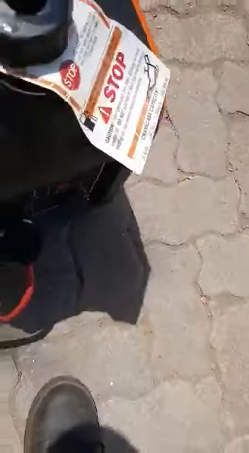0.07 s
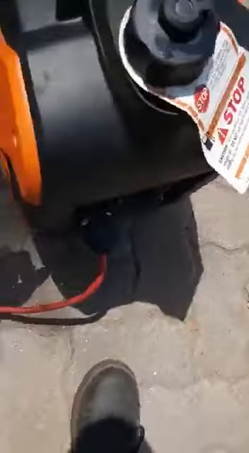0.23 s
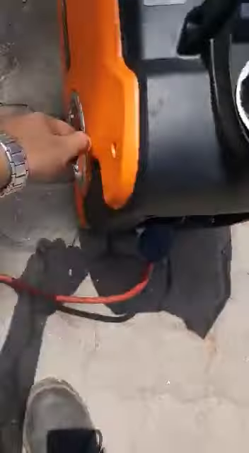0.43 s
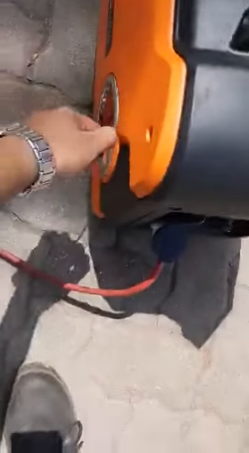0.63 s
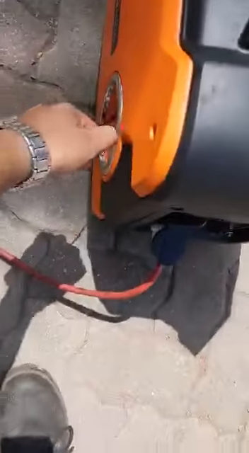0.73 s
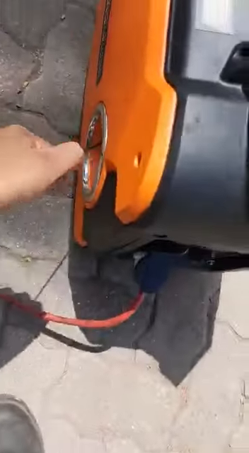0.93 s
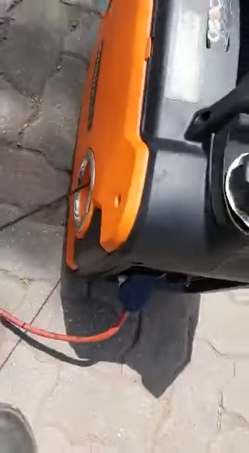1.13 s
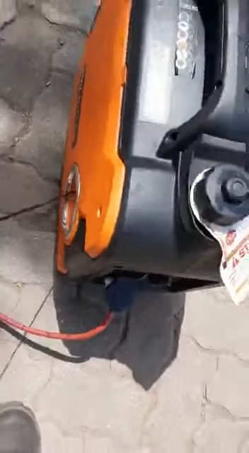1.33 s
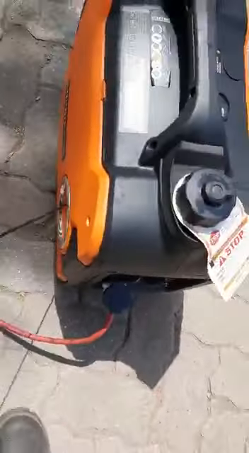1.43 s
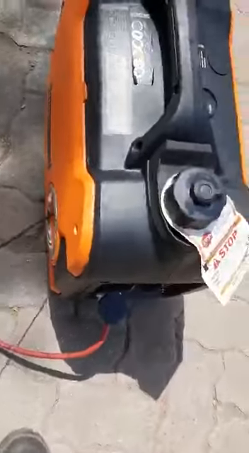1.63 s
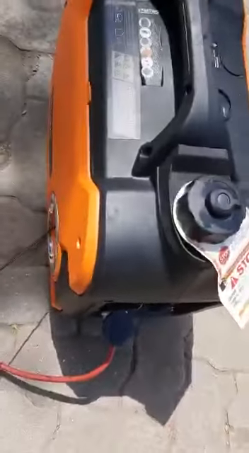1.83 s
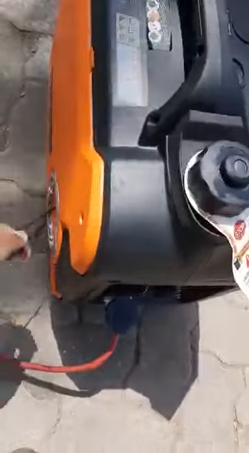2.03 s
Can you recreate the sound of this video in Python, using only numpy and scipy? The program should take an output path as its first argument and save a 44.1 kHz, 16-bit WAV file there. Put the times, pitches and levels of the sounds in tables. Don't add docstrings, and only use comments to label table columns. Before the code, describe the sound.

A small petrol generator is pull-started: light handling clicks, cord whir, metallic clack, then rapid thumping engine.

```python
import sys
import numpy as np
from scipy import signal
from scipy.fft import rfft, irfft
from scipy.io import wavfile

SR = 44100
rng = np.random.default_rng(int(sys.argv[2]) if len(sys.argv) > 2 else 0)


def voltage_ratio(level):
    return 10 ** (np.asarray(level, float) / 20)


def master(y):
    cut = np.clip(np.atleast_2d(y).T, -1, 1)
    pcm = np.round(cut * 32767)
    wavfile.write(sys.argv[1], SR, pcm.astype(np.int16))


N = 92345
T = np.arange(N) / SR

# (frequency [Hz], level [dB])
YARD_SPECTRUM = [(15, -37), (55, -4), (110, -10.5), (378, -17.5), (782, -35.5), (1500, -43.5),
                 (3000, -42.5), (15500, -48)]
# (frequency [Hz], likeness [0-1])
STEREO_LIKENESS = [(60, 0.2), (240, 0.59), (950, 0.16), (3770, 0.15), (15000, 0)]
# (time [s], left minus right [dB])
MIC_SWING = [(0.0, -0.5), (0.4, -2), (.7, -1), (1.2, 0.4), (2.09, 0.44)]
# (start [s], length [s], level [dB], colour [Hz], tilt above it [dB/octave])
RUBS = [(0.3514, 0.12, -38.5, 1670, -5.5), (.38, 0.038, -33, 2170, -8), (0.38, 0.046, -43.5, 590, -8.5),
        (0.55, 0.04, -43, 6500, -5), (0.626, 0.023, -37, 5070, -5), (0.714, 0.048, -38.5, 4200, -4.5),
        (.712, 0.045, -29, 410, -9.5), (1.5, 0.055, -27.5, 730, -5), (1.008, 0.47, -39, 2120, -10),
        (1.05, 0.42, -38.5, 540, -7)]
# (time [s], peak [dB], frequency [Hz], t60 [s])
BUMPS = [(0.104, -28.5, 143, 0.055), (0.404, -27, 106, 0.066), (0.439, -23, 310, 0.045),
         (0.468, -19, 144, 0.019), (0.514, -23, 72, 0.11), (0.75, -29, 70.0, 0.04),
         (0.927, -31, 195, 0.059), (0.972, -19, 158, 0.036), (0.999, -27.5, 101, 0.13),
         (1.195, -19, 235, 0.046), (1.05, -29, 267, 0.077), (1.273, -20, 139, 0.13),
         (1.285, -21.5, 336, .04), (1.379, -5.5, 201.4, 0.074), (1.387, -6.5, 300, 0.05)]
# (time [s], peak [dB], colour [Hz], decay [s])
TICKS = [(0.118, -27, 9300, 0.005), (0.2845, -36, 7200, 0.0071), (0.3616, -34, 2500, 0.0045),
         (0.362, -35, 7630, 0.0046), (0.389, -24, 1900, .008), (0.424, -28, 4000, 0.004),
         (0.4287, -22.5, 6370, 0.0047), (0.5406, -37, 5340, 0.0046), (0.579, -32.5, 8500, 0.004),
         (0.9995, -32, 1500, 0.006), (0.889, -34, 7800, 0.0057), (1.244, -19, 7310, 0.005),
         (1.2749, -23, 5490, 0.0065), (1.3, -16, 12000, 0.0079), (1.3323, -21.5, 14400, 0.0062),
         (1.3796, -9.5, 9000, 0.0066), (1.4115, -16, 5100, 0.0043), (1.535, -31, 11300, 0.0041),
         (1.5428, -19.5, 11100, 0.0088), (1.5515, -21, 14100, 0.0055), (1.6926, -32, 6180, 0.012),
         (1.8323, -30, 5980, 0.0065)]
# (time [s], level [dB])
SWITCH_HITS = [
    (.573, -21.5),
]
# (frequency [Hz], level [dB], t60 [s])
SWITCH_MODES = [(506, -5, 0.0073), (1020, 5, 0.0064), (1560, 2, 0.0052), (2200, -5, 0.0037)]
# (time [s], frequency [Hz], level [dB])
REEL_PULL = [(1.03, 689.2, -44.5), (1.07, 1025, -32.5), (1.104, 1360, -49.5), (1.14, 1650, -36.5),
             (1.18, 1900, -63), (1.2, 2110, -24), (1.218, 2178, -20), (1.228, 1923, -46),
             (1.243, 1630, -41)]
REEL_OVERRUN = [(1.245, 1900, -31), (1.255, 2335, -30.5), (1.264, 3077, -24), (1.288, 2927, -31.5),
                (1.299, 2938, -51), (1.344, 2753, -39), (1.366, 2420, -41), (1.384, 2150, -24)]
CORD_GUIDE_A = [(1, 1022, -42.5), (1.028, 1055, -53), (1.081, 1092, -32.5), (1.11, 1134, -42)]
CORD_GUIDE_B = [(1.163, 943, -39.5), (1.21, 1068, -32.5), (1.228, 1046, -40), (1.235, 960, -46)]
REEL_OVERTONE = [(1.145, 3700, -36), (1.179, 3850, -47.5), (1.211, 4200, -49), (1.25, 4300, -53)]
RETURN_SPRING = [(1.42, 749.5, -42), (1.476, 754, -38), (1.49, 700, -48)]
REEL_REWIND = [(1.586, 2200, -45), (1.63, 2330, -51), (1.682, 2200, -40), (1.726, 2068, -38),
               (1.751, 1920, -51), (1.772, 1810, -39.5), (1.809, 1590, -48)]
# (time [s], level [dB])
PAWL_HITS = [
    (1.380, -52),
    (1.411, -25),
    (1.422, -33),
]
# (frequency [Hz], level [dB], t60 [s])
PAWL_MODES = [(5240, -7, 0.17), (5350, -9.5, 0.11), (7090, -20, 0.05), (8300, -19, 0.045),
              (11500, -10, 0.048), (12340, -5, 0.11), (12580, -7, 0.092), (13300, -16, 0.1),
              (13700, -11, 0.08), (14800, -16, 0.099), (15210, -14, 0.09), (15720, -12, 0.09),
              (2350, -5, 0.024)]
# (time [s], level [dB], low edge [Hz], t60 [s])
SHIVERS = [
    (1.378, -20, 9000, 0.082),
    (1.409, -29.5, 10800, 0.28),
    (1.412, -16.5, 2980, 0.038),
]
# (time [s], peak [dB])
CASING_HITS = [(.391, -35), (.428, -32), (1.381, -14.5), (1.502, -14), (1.562, -18.5), (1.831, -18),
               (1.889, -36), (1.898, -22), (1.961, -22), (2.02, -21), (2.032, -25.5), (2.078, -27)]
# (frequency [Hz], level [dB], t60 [s])
CASING_MODES = [(1230, 4.5, 0.018), (1354, 1.5, 0.015), (1730, -2.5, 0.0063), (2200, -5, 0.013),
                (2830, -16, 0.0091), (830, -21, 0.009), (3900, -30, 0.008)]
# (frequency [Hz], level [dB])
CLATTER_SPECTRUM = [(290, -9), (450, 1), (680, -12), (1100, -12), (1770, -19.5), (2200, -16.5), (6180, -28),
                    (8600, -40.5), (15500, -35)]
# (time [s], strength [dB])
CYCLES = [(1.134, -26.5), (1.275, -10), (1.405, -9), (1.516, -8), (1.609, -7.5), (1.691, -7), (1.768, -7),
          (1.842, -7.5), (1.908, -5.5), (1.972, -5.5), (2.031, -4.5), (2.086, -11.5), (2.139, -13)]
# (place [0-1], sign, level [dB], push [ms], ring [Hz], t60 [s], boom [Hz], boom [dB])
STROKES = [
    (0, -1.05, 5.5, 2.41, 201, 0.012, 91.4, -44),
    (0.286, 0.96, 1.5, 2.24, 210, 0.011, 125, -14),
    (0.564, 1, -1.5, 2.4, 235, .035, 109, -34),
    (.83, 0.99, -14, 2.7, 222, 0.028, 70, -25),
]


def rms_one(x):
    return x / np.sqrt(np.mean(x ** 2) + 1e-20)


def at_hz(points, hz):
    point_hz, value = np.array(points).T
    return np.interp(np.log(hz), np.log(point_hz + 1), value)


def drift(rate_hz):
    r = np.exp(-2 * np.pi * rate_hz / SR)
    noise = rng.standard_normal(N + SR)
    return rms_one(signal.lfilter([1], [1, -2 * r, r * r], noise)[SR:])


def ring(drive, hz, t60_s):
    r = voltage_ratio(-60 / (t60_s * SR))
    w = 2 * np.pi * hz / SR
    return signal.lfilter([0, np.sin(w)], [1, -2 * r * np.cos(w), r * r], drive + 1e-18)


def clicks(s, size):
    out = np.zeros(N + SR)
    np.add.at(out, (np.asarray(s) * SR).astype(int), size)
    return out[:N]


def late(x, ms):
    return np.interp(T - ms / 1000, T, x, left=0)


def filtered(x, order, hz, kind):
    return signal.sosfilt(signal.butter(order, hz, kind, fs=SR, output="sos"), x)


def banded(spectrum, patchy_db):
    white = rng.standard_normal((2, 2, N))
    shared = drift(10.2)
    edges_hz = 22 * 2 ** np.arange(0, 9.6, .5)
    out = 0
    for k, (low, high) in enumerate(zip(edges_hz, edges_hz[1:])):
        mid, side = filtered(white[k % 2], 2, [low, high], "band")
        hz = np.sqrt(low * high)
        alike = np.clip(at_hz(STEREO_LIKENESS, hz), 0, 1)
        gain = voltage_ratio(at_hz(spectrum, hz) + patchy_db * (0.63 * shared + drift(13.9)))
        out = out + gain * (np.sqrt(1 + alike) * mid + np.sqrt(1 - alike) * side * [[1], [-1]])
    return rms_one(out)


def struck(hits, modes, spread_db, bounce_db):
    s, db = np.transpose(hits)
    s = np.r_[s, s + .0024]
    db = np.r_[db, db + bounce_db]
    out = 0
    for hz, level_db, t60_s in modes:
        strength_db = db + level_db + spread_db * rng.standard_normal(len(s))
        out = out + ring(clicks(s, voltage_ratio(strength_db)), hz, t60_s)
    return out


def yard():
    return voltage_ratio(-42.5) * banded(YARD_SPECTRUM, patchy_db=1.5)


def rubs():
    out = 0
    for s, length_s, db, hz, tilt_db in RUBS:
        grains = rng.standard_normal(N) * voltage_ratio(2.0 * drift(200))
        octave = np.log2(np.fft.rfftfreq(N, 1 / SR) / hz + 1e-6)
        colour = voltage_ratio(np.where(octave > 0, tilt_db * octave, 1.65 * octave))
        shape = np.interp(T, s + length_s * np.array([0, .12, .6, 1]), [0, 0.72, 1.0, 0.05])
        out = out + voltage_ratio(db) * shape * rms_one(irfft(rfft(grains) * colour, N))
    return out


def bumps():
    out = 0
    for s, db, hz, t60_s in BUMPS:
        push = signal.lfilter(np.hanning(90) / 45, 1, clicks([s], voltage_ratio(db)))
        out = out + ring(push, hz, t60_s)
    return out


def ticks():
    out = np.zeros(N)
    for s, db, hz, decay_s in TICKS:
        start = np.searchsorted(T, s)
        u = T[start:start + 2000] - s
        band_hz = [0.51 * hz, min(2.26 * hz, 17000)]
        snap = filtered(rng.standard_normal(2000), 1, band_hz, "band")
        out[start:start + 2000] += voltage_ratio(db - 5.0) * snap * np.exp(-2 * u / decay_s)
    return out


def switch():
    return -.5 * struck(SWITCH_HITS, SWITCH_MODES, spread_db=6.0, bounce_db=-20)


def whine():
    rough, flutter_hz = .2, 70
    out = 0
    for track in (REEL_PULL, REEL_OVERRUN, CORD_GUIDE_A, CORD_GUIDE_B, REEL_OVERTONE,
                  RETURN_SPRING, REEL_REWIND):
        s, hz, db = np.transpose(track)
        gate = np.interp(T, [s[0] - .008, s[0], s[-1], s[-1] + 0.0067], [0, 1, 1, 0])
        turn = np.exp(2j * np.pi * np.cumsum(np.interp(T, s, hz)) / SR)
        flutter = 1 + rough * (drift(flutter_hz) + 1j * drift(flutter_hz))
        out = out + 1.23 * voltage_ratio(np.interp(T, s, db)) * gate * (turn * flutter).real
    return out


def pawl():
    chatter = 1 + 0.82 * drift(150)
    return struck(PAWL_HITS, PAWL_MODES, spread_db=4.5, bounce_db=-5.5) * chatter


def shivers():
    out = 0
    for s, db, low_hz, t60_s in SHIVERS:
        hiss = filtered(rng.standard_normal((2, N)), 3, low_hz, "high")
        decay = voltage_ratio(db - 60 * np.maximum(T - s, 0) / t60_s) * (T >= s)
        out = out + decay * rms_one(hiss)
    return out


def casing():
    return .5 * struck(CASING_HITS, CASING_MODES, spread_db=1.7, bounce_db=-6)


def thumps():
    late_gain_db_per_s, spread_db, boom_t60_s = 11.5, 1.0, 0.024
    s, db = np.transpose(CYCLES)
    sound, beats = 0, 0
    for place, sign, level_db, push_ms, hz, t60_s, boom_hz, boom_db in STROKES:
        growth_db = late_gain_db_per_s * place * (s[:-1] - 1.88)
        chance_db = spread_db * rng.standard_normal(len(s) - 1)
        hits = clicks(s[:-1] + place * np.diff(s), voltage_ratio(db[:-1] + level_db + growth_db + chance_db))
        u = np.arange(400) / SR * 1000 / push_ms
        pulse = np.sin(np.pi * np.minimum(u, 1)) ** 2 * 2000 / push_ms / SR
        push = signal.lfilter(pulse, 1, hits)
        boom = voltage_ratio(boom_db) * ring(push, boom_hz, boom_t60_s)
        sound = sound + sign * 1.53 * (ring(push, hz, t60_s) + boom)
        beats = beats + hits
    return sound, beats


def churn(run_db):
    air = ring(ring(rng.standard_normal(N), 262, 2.0 / 300), 200, 0.004)
    return voltage_ratio(-36 + 0.86 * run_db + 2.6 * drift(17)) * rms_one(air)


def clatter(run_db, beats):
    puff_db, puff_s = 5.5, 0.0031
    puff = 1 + voltage_ratio(puff_db) * signal.lfilter([1], [1, -np.exp(-1 / (puff_s * SR))], beats)
    return voltage_ratio(-37.5 + .5 * run_db) * puff * banded(CLATTER_SPECTRUM, patchy_db=3.5)


def engine():
    s, db = np.transpose(CYCLES)
    run_db = np.interp(T, np.r_[.85, s], np.r_[-45, db]) + 16.5
    sound, beats = thumps()
    return sound + churn(run_db), clatter(run_db, beats)


def yard_echoes(x):
    left = late(x, 1.3) - 0.83 * late(x, 7.3)
    right = late(x, 3.1) - 0.73 * late(x, 9.7)
    return voltage_ratio(-11) * np.array([left, right])


def scene():
    body, rattle = engine()
    small = casing() + pawl() + switch() + ticks() + rubs() + whine()
    near = body + small + bumps()
    direct = np.array([near, late(near, 0.13)])
    whole = direct + yard_echoes(small) + rattle + shivers() + yard()
    pan_db = np.interp(T, *np.transpose(MIC_SWING)) / 2
    return whole * voltage_ratio(np.array([pan_db, -pan_db]))


def roll_off(x):
    return signal.sosfilt(signal.butter(12, 16970, fs=SR, output="sos"), x)


def record(dry):
    top_cut_hz, bass_cut_hz = 16000, 63
    low_pass = signal.cheby2(10, 35, 1.04 * top_cut_hz, fs=SR, output="sos")
    mix = filtered(signal.sosfilt(low_pass, dry), 3, bass_cut_hz, "high")
    return roll_off(mix)


dry = scene()
out = record(dry)
master(out)
```